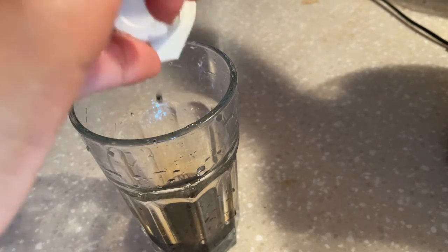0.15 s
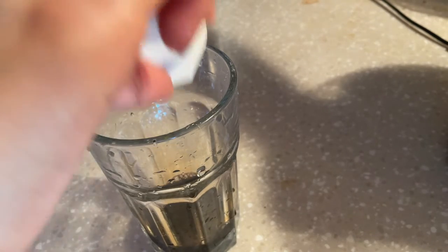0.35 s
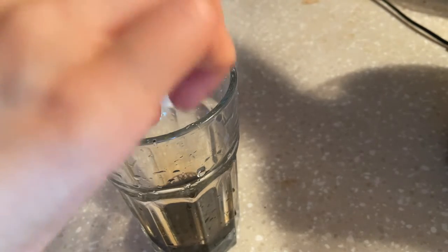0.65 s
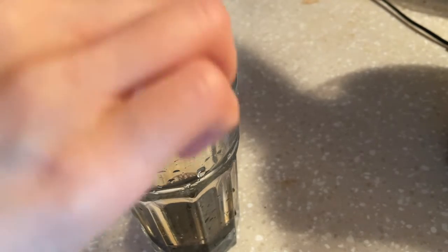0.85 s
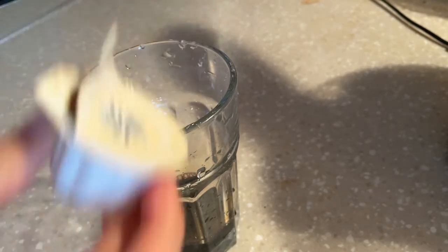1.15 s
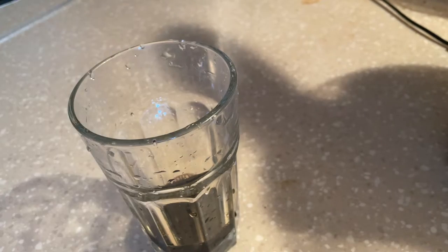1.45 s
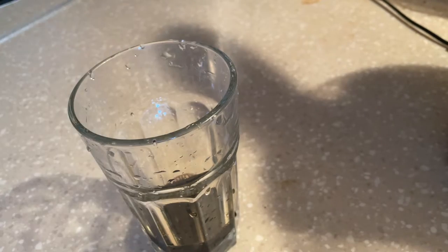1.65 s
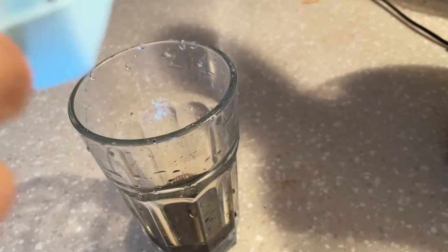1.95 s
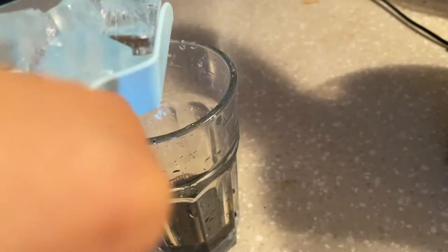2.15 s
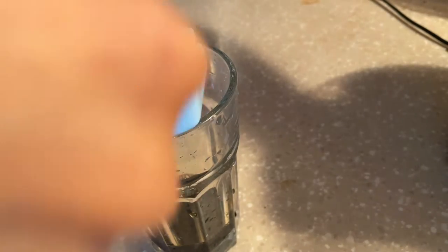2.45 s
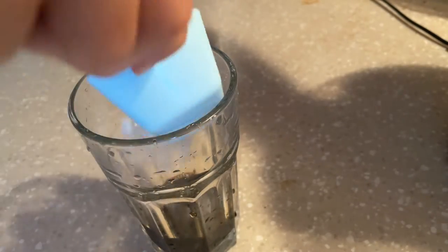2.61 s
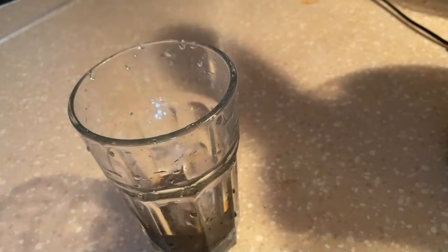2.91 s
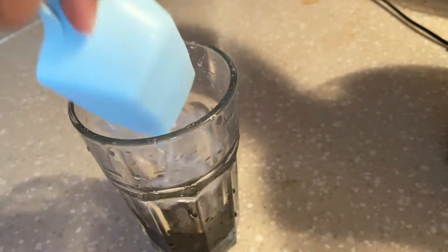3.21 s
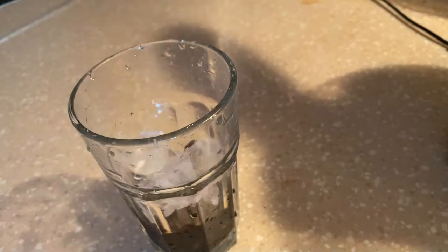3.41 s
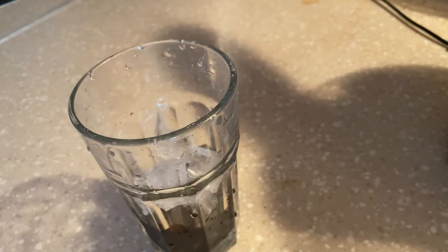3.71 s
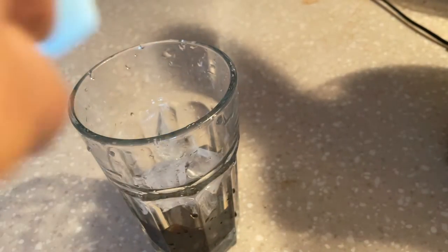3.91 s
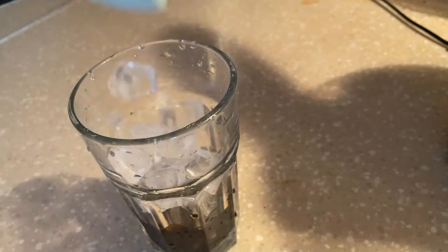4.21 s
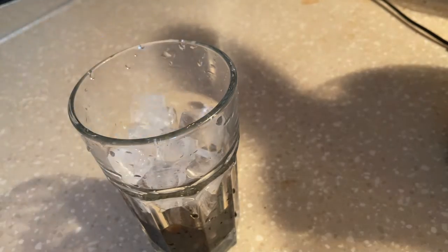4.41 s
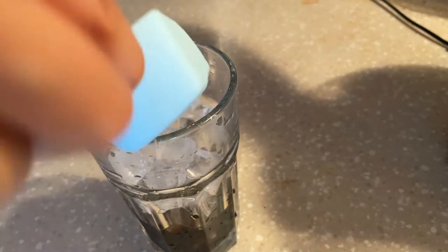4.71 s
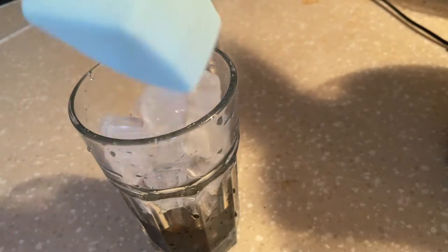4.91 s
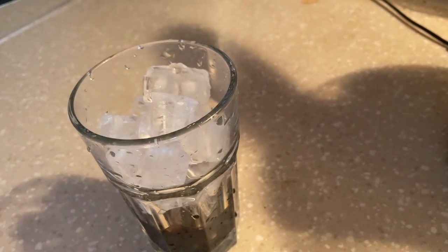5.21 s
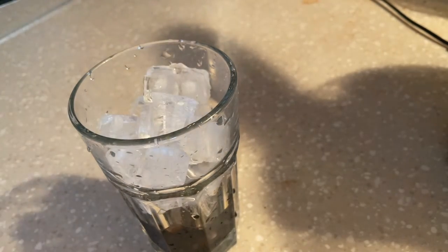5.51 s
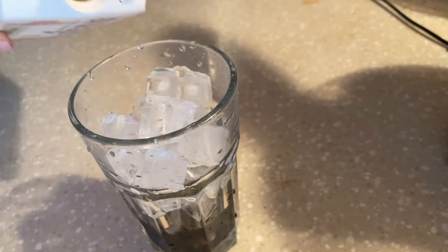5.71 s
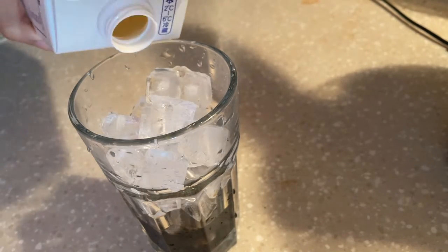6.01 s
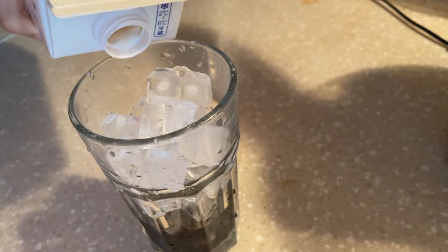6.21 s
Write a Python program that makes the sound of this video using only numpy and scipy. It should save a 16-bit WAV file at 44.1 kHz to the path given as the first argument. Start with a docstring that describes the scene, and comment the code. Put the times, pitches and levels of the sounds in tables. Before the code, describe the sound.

Ice cubes are scooped with a hollow plastic rumble and tipped in bright, sharp clattering bursts into a heavy glass on a kitchen counter.

```python
"""Ice scooped into a tumbler

After a plastic snap, ice is dug from a plastic bin and tipped in four scoopfuls into a thick tumbler.
Cubes, glass wall and counter ring as decaying modes; cracks, scrapes and grinding are shaped noise.
The bin is shut and a carton bumps softly; faint ticks fall in the pauses and the level dips twice.
A small kitchen answers, heard through two ports that differ in level and phase."""
import sys
import numpy as np
from scipy import signal
from scipy.fft import rfft, irfft, next_fast_len
from scipy.io import wavfile
from scipy.ndimage import uniform_filter1d

SR = 44100
rng = np.random.default_rng(int(sys.argv[2]) if len(sys.argv) > 2 else 0)


def dump_mix(stems):
    """Bounce the given channels to the path in sys.argv[1] as a 16-bit WAV at rate SR."""
    frames = np.atleast_2d(stems).T  # one column per channel
    limited = np.clip(frames, -1, 1)  # hard clip at full scale
    pcm = np.round(limited * 32767).astype(np.int16)
    wavfile.write(sys.argv[1], SR, pcm)


N = 280035
TOP_HZ = 15800

# tumbler wall, main modes: f/Hz, level/dB, undamped t60/s
WALL = [(2358, -4, .23), (4813, 0, .18), (8225, 4, .12), (12556, 3, .12)]
# tumbler wall, weaker modes: f/Hz, level/dB, undamped t60/s
OVERTONES = [(2361, -13, .65), (3510, -4, .14), (5750, -2, .15), (8785, -6, .11), (9430, -5, .14),
             (11010, -7, .16), (13113, -9, .09), (15480, -10, .09)]
# colour of cubes cracking and rattling: f/Hz, level/dB
RATTLE = [(600, -41.5), (1800, -5.5), (3100, -1.5), (4000, -10.5), (5000, -1.5), (7000, -13), (9500, -6.5),
          (16000, -48)]
# colour of splintering and scraping ice: f/Hz, level/dB
SCRAPE = [(3000, -27), (6000, -9), (8500, 8.5), (11000, -3.5), (13000, -5.5), (15700, -11)]
# colour of knocks on the counter: f/Hz, level/dB
KNOCK = [(30, -36.5), (85, 4.5), (180, -6.5), (410, 3), (620, 0.5), (1000, -4), (1800, -9.5), (3000, -1.5),
         (8000, -51)]
# colour of cubes on hard plastic: f/Hz, level/dB
CLATTER = [(300, -41), (550, -15.5), (760, 1.5), (1100, 5), (1400, -3), (1700, -2.5), (2000, -5),
           (2400, -8), (3300, -11), (4200, -17), (6000, -26.5), (12000, -50.5)]
# scoopfuls: first slide t/s, full movement t/s, settling starts t/s,
# relative rattle, scrape, scoop drumming and wall singing levels/dB, settling rate/(dB/s)
TIPS = [(2.256, 2.5, 2.752, -35.5, -39, -39, -35.5, 79), (3.149, 3.233, 3.297, -33, -49, -53, -41, 98.5),
        (3.903, 4.055, 4.267, -35, -39, -56, -53, 146.5),
        (4.632, 4.699, 4.86, -32.5, -42.5, -48.5, -48, 116)]


def amp(db):
    """Decibels to gain."""
    return 10 ** (np.asarray(db) / 20)


def unit(x):
    """Scale to rms 1."""
    return x / np.sqrt(np.mean(x ** 2) + 1e-20)


def along(points, hz):
    """Read (f/Hz, value) points on a log frequency axis."""
    f, v = np.transpose(points)
    return np.interp(np.log(hz + 1), np.log(f + 1), v)


def gains(tables):
    """One gain per sample for each (t/s, level/dB) curve, silent outside it."""
    t = np.arange(N) / SR
    curves = []
    for table in tables:
        s, db = np.transpose(table)
        inside = (t >= s[0]) * (t <= s[-1])
        curves.append(amp(np.interp(t, s, db)) * inside)
    return np.array(curves)


def filtered(x, response):
    """Multiply the spectrum of x by a response of frequency."""
    m = next_fast_len(N + 8192)
    return irfft(rfft(x, m) * response(np.fft.rfftfreq(m, 1 / SR)), m)[..., :N]


def add(track, s, sound):
    """Mix a sound into a track from time s on."""
    part = track[..., round(s * SR):][..., :sound.shape[-1]]
    part += sound[..., :part.shape[-1]]


def spread(pair, spectrum):
    """Turn two unrelated signals into coloured left and right of joint rms 1, as mid plus and minus side."""
    # f/Hz, left-right correlation
    alike = [(60, 0.95), (280, 0.93), (700, 0.062), (1500, 0.1), (3000, 0.43), (6000, 1)]

    def mid_side_gains(hz):
        turn = np.arccos(np.clip(along(alike, hz), -1, 1)) / 2
        return amp(along(spectrum, hz)) * [np.cos(turn), np.sin(turn)]

    mid, side = filtered(pair, mid_side_gains)
    return unit(np.array([mid + side, mid - side]))


def noise(spectrum):
    """Coloured stereo noise of rms 1."""
    return spread(rng.standard_normal((2, N)), spectrum)


def bursts(times, dbs, t60):
    """Envelope of blows that start at once and decay exponentially; their powers add."""
    power, t = np.zeros(N), np.arange(SR // 2) / SR
    fade = amp(-60 * t / t60) ** 2
    for s, db in zip(times, dbs):
        add(power, s, amp(db) ** 2 * fade)
    return np.sqrt(power)


def contacts(rate, scatter_db, t60):
    """Random shower of tiny contacts, each a decaying crackle of its own size; rms 1."""
    hits = rng.random(N) < rate / SR
    sizes = hits * amp(scatter_db * np.clip(rng.standard_normal(N), -2, 2))
    power = signal.lfilter([1], [1, -amp(-60 / (t60 * SR)) ** 2], sizes ** 2)
    return unit(np.sqrt(power) * rng.standard_normal((2, N)))


def tinkles(pitch_hz, width, t60, count):
    """Many small touches of cube on cube, each a short blip of its own pitch; rms 1."""
    starts = rng.integers(N, size=(count, 1))
    pitch, size = rng.standard_normal((2, count, 1))
    age = np.arange(int(t60 * SR) + 1)
    hz = np.minimum(pitch_hz * np.exp(width * pitch), TOP_HZ)
    fade = amp(3.1 * size) * amp(-60 * age / len(age))
    blips = fade * np.sin(np.float32(2 * np.pi * hz / SR * age))
    return unit(np.bincount((starts + age).ravel(), blips.ravel(), N)[:N])


def ring(modes, dbs, scatter_db, damping=1):
    """Sum of decaying struck modes, each at a slightly new strength and pitch."""
    hz, level, t60 = np.transpose(modes)
    size, detune, sign = rng.standard_normal((3, len(hz)))
    gain = np.sign(sign) * amp(level + dbs + scatter_db * size)
    pitch, life = hz + (4 + 0.001 * hz) * detune, t60 / damping
    t = np.arange(int(min(life.max(), .6) * SR) + 1, dtype=np.float32) / SR
    sound = np.zeros(len(t))
    for g, f, span in zip(gain.tolist(), pitch.tolist(), life.tolist()):
        u = t[:int(span * SR)]
        decay = np.exp(-float(np.log(1000)) / span * u)
        sound[:len(u)] += g * decay * np.sin(2 * np.pi * f * u)
    return sound


def handling():
    """Plastic snap stronger on the left, bin lid shutting and settling, soft carton bump: noise bursts and modes."""
    # crack of the snap: f/Hz, level/dB
    cap = [(150, -12), (700, -16), (1900, -2.5), (2400, -17), (3100, 4.5), (4400, -2.5), (5700, -20.5),
           (7000, -17.5), (8500, -48), (16000, -68.5)]
    # slap of the lid: f/Hz, level/dB
    lid = [(60, -23), (250, -17.5), (500, -1.5), (1300, -8), (2400, -11.5), (4500, -22), (12500, -24),
           (16000, -33.5)]
    # bump of the carton: f/Hz, level/dB
    carton = [(30, -6), (100, 0), (200, -12), (1000, -29), (9000, -66)]
    # snapping plastic: f/Hz, level/dB, t60/s
    cap_modes = [(749.5, -37, 0.11), (1240, -31.5, 0.076), (1874, -38, 0.076), (2970, -26.5, .03)]
    # bin lid: f/Hz, level/dB, t60/s
    lid_modes = [(538, -31, 0.28), (840, -31.5, 0.15), (1155, -37, 0.2)]
    snap_s, shut_s = .0572, 5.520

    def blow(s, db, t60, colour):
        return bursts([s], [db], t60) * noise(colour)

    snap = blow(snap_s, -13.5, 0.014, cap)
    shut = blow(shut_s, -31, 0.34, lid)
    tap = blow(5.743, -42.5, 0.078, lid)
    bump = blow(5.917, -38, 0.22, carton)
    add(snap, snap_s, ring(cap_modes, 0, scatter_db=1))
    add(shut, shut_s, ring(lid_modes, 0, scatter_db=1))
    return snap * amp([[2], [-2]]), shut, tap, bump


def ticks():
    """A few faint, dry ticks: short coloured noise bursts."""
    # t/s, level/dB
    moments = [(1.1028, -62), (1.186, -61), (5.4383, -66.5), (5.9065, -59)]
    # f/Hz, level/dB
    colour = [(500, 1), (2000, -5), (4000, -4.5), (7000, -5.5), (13000, -6), (16000, -22)]
    return bursts(*np.transpose(moments), t60=0.024) * noise(colour)


def dig():
    """Cubes grind together under the scoop and drum on the hollow bin: contact showers through wall resonances."""
    # effort of the scoop, one curve per stroke: t/s, level/dB
    effort = [
        [(1.363, -26), (1.511, -18.5), (1.673, -20), (1.687, -17.5), (1.873, -32), (1.947, -28), (2.065, -48),
         (2.099, -36.5), (2.26, -61.5)],
        [(3.693, -26), (3.707, -25.5), (3.855, -25), (3.863, -29), (3.891, -23.5), (3.905, -35), (3.979, -31),
         (4.027, -46), (4.06, -49)],
    ]
    # per stroke, deep booms and shallow crunches: boom/dB, crunch/dB
    strokes = [(-7.5, -5.5), (-12.5, -1)]
    # cubes toppling in bin and lifted scoop: t/s, relative clatter/dB, relative crunch/dB
    topples = [(1.363, -25, -30), (1.384, -15.5, -23.5), (1.506, -14.5, -25.5), (1.601, -10.5, -20.5),
               (1.677, -11.5, -25), (1.711, -13, -35), (2.151, -23.5, -42.5), (2.279, -25, -38.5),
               (2.321, -35.5, -32), (3.818, -18, -22.5), (3.879, -9.5, -39)]
    # bin walls: f/Hz, width/Hz, level/dB
    bin_modes = [(720, 25, -3), (800, 35, -1), (890, 25, 1), (1015, 22, 1), (1100, 18, 2), (1227, 27, 1),
                 (1428, 25, 0), (1655, 32, 2), (1900, 90, -7), (2250, 140, -6)]
    # colour of the hollow boom: f/Hz, level/dB
    boom_colour = [(60, -44.5), (180, -33), (330, -8.5), (550, 5.5), (720, 3.5), (1000, -16.5),
                   (3000, -51.5)]
    # colour of crushed ice: f/Hz, level/dB
    crunch_colour = [(1000, -17.5), (1600, -5), (2400, -7.5), (4000, 0), (5600, -4), (8500, 1.5),
                     (12800, 0), (15700, -8)]
    hard_push_db = -19  # reference effort
    boom_grows, crunch_grows = 1.8, 1.106  # dB per dB of effort

    push = gains(effort) / amp(hard_push_db)
    deep, shallow = amp(hard_push_db + np.transpose(strokes))
    boom = deep @ push ** boom_grows
    clatter = amp(hard_push_db) * push.sum(axis=0)
    crunch = shallow @ push ** crunch_grows
    s, clatter_db, crunch_db = np.transpose(topples)
    clatter = np.hypot(amp(0.5) * clatter, bursts(s, clatter_db - 7.0, t60=0.13))
    crunch = np.hypot(amp(-1) * crunch, bursts(s, crunch_db, t60=0.11))

    grind = contacts(rate=1000, scatter_db=3.5, t60=.022)
    # each mode reaches the two ports at its own phase
    phases = np.exp(2j * np.pi * rng.random((len(bin_modes), 2, 1)))

    def walls(f):
        response = 0
        for turn, (centre, width, db) in zip(phases, bin_modes):
            loss = 1j * f * width
            response = response + turn * amp(db) * loss / (centre * centre - f * f + loss)
        return response

    drumming = unit(filtered(grind[0], walls))
    body = amp(-1.5) * spread(grind, CLATTER) + amp(-4.5) * drumming
    return amp(-3) * boom * noise(boom_colour) + clatter * body + crunch * spread(grind, crunch_colour)


def stir(t, start, full, settle, fall):
    """Movement of one scoopful in dB: linear swell (running on below the start), hold, steady settling."""
    swell_db = 22  # rise from first slide to full movement
    swell = swell_db * np.minimum(t - full, 0) / max(full - start, .01)
    return swell - fall * np.maximum(t - settle, 0)


def jostle():
    """Cubes scrape and tinkle together, drum on the scoop and keep the wall singing: showers follow the movement."""
    # how strongly sliding ice excites each main wall mode: level/dB
    rubbed = [3, -5.5, -13.5, -14.5]
    sing_fades = 1.1  # singing swells and fades this much faster in dB
    t = np.arange(N) / SR
    levels = 0
    for start, full, settle, *dbs, fall in TIPS:
        movement_db = np.outer([1, 1, 1, sing_fades], stir(t, start, full, settle, fall))
        levels = levels + amp(np.c_[dbs] + movement_db)
    rattle, scrape, drum, sing = levels

    touches = contacts(rate=600, scatter_db=3, t60=.014)
    blips = tinkles(pitch_hz=4200, width=.3, t60=.04, count=1600)
    cubes = amp(-3) * blips + amp(-5) * spread(touches, RATTLE)
    low_overtones = [mode for mode in OVERTONES if mode[0] < 10000]
    wall = ring(WALL + low_overtones, rubbed + [-7] * len(low_overtones), scatter_db=-1)
    singing = signal.fftconvolve(sing * touches[0], wall / np.linalg.norm(wall))[:N]
    plastic = drum * spread(contacts(rate=200, scatter_db=3, t60=0.023), CLATTER)
    rattling = rattle * (amp(-1.0) * cubes + amp(-8.5) * noise(KNOCK))
    scraping = amp(4.5) * scrape * spread(touches, SCRAPE)
    return plastic + rattling + scraping + singing


def nudges(count):
    """Small random knocks of each scoopful, as strong as its movement; rows like the landings in drops()."""
    level_db, scatter_db, settle_s = -3.5, 2.5, 0.3  # level over the rattle, spread, time past settling
    hard_db, wall_db, typical_hz = -15.5, -12, 4320  # splinter and wall ring over clack, cube pitch
    rows = []
    for start, full, settle, rattle_db, *_, fall in TIPS:
        slots = (np.arange(count) + rng.random(count)) / count
        times = full + slots * (settle + settle_s - full)
        draws = np.clip(rng.standard_normal((count, 3)), -2, 2)
        for s, (size, hard, pitch) in zip(times, draws):
            db = rattle_db + stir(s, start, full, settle, fall) + level_db + scatter_db * size
            pitch_hz = typical_hz * np.exp(.2 * pitch)
            rows.append((s, db, hard_db + scatter_db * hard, db + wall_db, pitch_hz))
    return rows


def cube(pitch_hz, width, t60, others_db, count):
    """Modes of one ice cube: a main one and a few shorter ones around it."""
    others = pitch_hz * np.exp(width * rng.standard_normal(count))
    return [(pitch_hz, 0, t60)] + [(min(hz, TOP_HZ), others_db, t60 / 2) for hz in others]


def drops():
    """Cubes crack on the glass, ring themselves and the wall, thump the counter; hard contacts ring brighter."""
    # loudest landings: t/s, relative clack/dB, hardness (splinter over clack)/dB, wall ring/dB, cube f/Hz
    landed = [(2.427, -22, -5.5, -32.5, 5235), (2.455, -32, 2, -30.5, 3227),
              (2.4784, -20.5, 1.5, -19, 5950), (2.5602, -25, -11.5, -36.5, 2840),
              (2.587, -25.5, -9.5, -29, 3180), (2.683, -38, 8, -41.5, 5800), (2.7063, -24, -24, -29, 3420),
              (2.733, -23, -18.5, -31, 6000), (2.751, -29, -22, -30, 4270), (2.814, -37, -17, -35, 5510),
              (2.866, -44, 12, -61.5, 5770), (2.879, -37.5, -2, -57, 4540), (2.9289, -40, 0.5, -60.5, 4580),
              (2.9626, -43.5, 8.5, -62, 4520), (3.1636, -35, -2.5, -49.5, 4330),
              (3.1741, -21, -20.5, -14, 3000), (3.218, -28.5, 5, -40.5, 6100),
              (3.2293, -16.5, -4, -27, 3270), (3.253, -28.5, 0.5, -38.5, 3060),
              (3.2909, -22.5, -21.5, -37, 3510), (3.336, -45.5, -38, -30.5, 3480),
              (3.413, -33.5, -10, -38, 3480), (3.452, -33, 0, -48, 2770), (3.4836, -40.5, -5.5, -56, 5580),
              (4.0655, -19, -12, -46, 3265), (4.1216, -23.5, -3.5, -32.5, 3190),
              (4.1717, -26, -10.5, -29.5, 3510), (4.1996, -37, 12, -30.5, 3030),
              (4.214, -35, -5.5, -24.5, 3080), (4.248, -30.5, -10.5, -38.5, 3550),
              (4.2916, -30.5, -2, -48.5, 4500), (4.425, -44.5, 1, -60, 3320),
              (4.5194, -44, -9, -61.5, 4550), (4.6913, -12.5, -7, -30.5, 3290),
              (4.7396, -27, -14, -39, 3210), (4.7835, -21, 1, -23.5, 4390), (4.812, -33, 3, -30.5, 4440),
              (4.8945, -32, -3.5, -44, 4490), (4.9358, -30, -4, -39.5, 5160), (4.96, -27, -1, -29.5, 5070),
              (5.0242, -35.5, -9, -56, 5060), (5.079, -39, -10, -58, 5270)]
    # glass foot on the counter: f/Hz, level/dB, t60/s
    counter = [(75, -19.5, 0.89), (92.5, -6.5, 0.32), (144, -5, 0.28), (217, -6, 0.37), (272.5, -4.5, 0.25),
               (403.7, 1.5, 0.22), (534, 2, 0.092), (690, -7, 0.071), (875, -20.5, 0.038), (1013, -4, 0.23),
               (1619, -14.5, 0.056), (1746, -7, 0.05)]
    # how strongly a blow excites each main wall mode: level/dB
    struck = [2.1, -1.2, 2.8, 1.87]
    # a higher pile lands cubes nearer the rim: t/s, top wall mode over lowest/dB
    rim = [(2.4, -10.5), (5, -2)]
    # a firmer pile passes more of a blow to the counter: t/s, relative thump/dB
    thump_curve = [(2.4, -21), (4.7, -17)]
    thump_grows = 0.71  # dB of thump per dB of clack
    rebound_s, rebound_db = 0.0084, -8.5  # corner, then face: mean delay and relative level
    width_db = -2  # cube ring in opposite phase at the two ports

    glass, foot = np.zeros((2, N)), np.zeros(N)
    landings = np.array(landed + nudges(count=9))
    s, clack_db, hard_db = landings.T[:3]
    thumps = np.interp(s, *np.transpose(thump_curve)) + thump_grows * clack_db
    rebounds = s + rebound_s * (.5 + rng.random(len(landings)))
    octaves = np.log2([hz / WALL[0][0] for hz, _, _ in WALL])
    for (at, clack, hard, ring_db, pitch_hz), thump_db, again in zip(landings, thumps, rebounds):
        tilt_db = hard + np.interp(at, *np.transpose(rim))
        wall_db = ring_db + np.array(struck) + tilt_db * octaves / octaves[-1]
        # ice piling up against the wall shortens its ring
        packed = np.interp(at, [2.4, 5], [.8, 1.7])
        # a hard blow leaves the cube leaning on the wall
        pressed = np.interp(max(wall_db), [-26, -17], [1, 2])
        add(glass, at, amp(6.5) * ring(WALL, wall_db, scatter_db=2.5, damping=packed * pressed))
        overtones = ring(OVERTONES, clack + hard / 2, scatter_db=2.5, damping=packed)
        add(glass, at, amp(-11.5) * overtones / packed ** 2)
        ice = cube(pitch_hz, width=.25, t60=0.056, others_db=-6, count=4)
        for when, db in (at, clack), (again, clack + rebound_db):
            common = amp(1.0) * ring(ice, db, scatter_db=3.5)
            opposed = np.outer([1, -1], ring(ice, db + width_db, scatter_db=3.0))
            add(glass, when, common + opposed)
        add(foot, at, amp(-6.5) * ring(counter, thump_db, scatter_db=4))

    both_contacts_db = np.r_[clack_db, clack_db + rebound_db]
    crack = bursts(np.r_[s, rebounds], both_contacts_db + 7, t60=0.01) * noise(RATTLE)
    splinters = bursts(s, clack_db + hard_db + 6, t60=0.071) * noise(SCRAPE)
    knock = bursts(s, thumps + 3, t60=0.14) * noise(KNOCK)
    # a landed cube rocks and chatters for a moment
    touches = tinkles(pitch_hz=3504, width=0.13, t60=0.0073, count=3000)
    chatter = bursts(s, clack_db - 11, t60=0.1) * touches
    return glass + foot + crack + splinters + knock + chatter


def kitchen(x):
    """Room answer: convolution with a delayed noise tail whose frequencies decay at their own rates."""
    # f/Hz, t60/s
    decay = [(100, 1), (500, 0.11), (3000, 0.34), (7000, 0.098), (15000, 0.074)]
    hz, t, z = signal.stft(rng.standard_normal((2, SR // 2)), SR, nperseg=256)
    fade = amp(-60 * t / along(decay, hz)[:, None])
    tail = signal.istft(z * fade, SR, nperseg=256)[1]
    tail = np.pad(tail, ((0, 0), (round(0.0037 * SR), 0)))
    return signal.fftconvolve(x, tail / np.linalg.norm(tail[0]), axes=1)[:, :N]


def quiet_kitchen():
    """Background hush: coloured noise under a slow level curve."""
    # f/Hz, level/dB
    colour = [(25, -13.5), (55, -2), (105, -4.5), (150, -19), (400, -15), (650, -24), (1300, -25.5),
              (2700, -41), (7000, -55), (15000, -60.5)]
    # t/s, relative level/dB
    level = [(0, -56.5), (4.4, -62.5), (4.6, -65.5), (5.4, -64.5), (5.7, -56), (6.35, -59)]
    return amp(-2) * gains([level])[0] * noise(colour)


def breaks(depth_db):
    """Gain that drops abruptly for two short moments."""
    # from t/s, to t/s
    spans = [(4.531, 4.635), (5.636, 5.738)]
    t = np.arange(N) / SR
    inside = sum((t > start) * (t < end) * 1. for start, end in spans)
    return amp(depth_db * uniform_filter1d(inside, size=400))


def scene():
    """Sources and room echo under the level dips, plus ticks and hush, which do not dip."""
    glass, scoop = drops() + jostle(), dig()
    snap, shut, tap, bump = handling()
    echo = kitchen(amp(-11.5) * glass + amp(-9.5) * scoop + amp(-13) * snap + amp(-11.5) * (shut + tap))
    hush = quiet_kitchen()
    sources = glass + scoop + snap + shut + tap + bump
    return breaks(depth_db=-21.5) * (sources + echo) + ticks() + hush


def record(dry):
    """Two ports differ in level and phase, share most of the high treble and round off the tallest peaks."""
    # f/Hz, left minus right level/dB
    left = [(60, -3.5), (380, -1), (700, 1), (1300, 2.5), (2400, 7), (4500, 4), (6000, 1), (13000, 0)]
    # f/Hz, phase lead of the left port/rad
    lead = [(1800, 0), (3100, 1), (4100, .4), (5200, .4), (5700, -1), (6700, -1), (7600, -2.7),
            (8250, -2.95), (8900, -3.2), (10300, -4), (12700, -2 * np.pi)]
    mid, side = (dry[0] + dry[1]) / 2, (dry[0] - dry[1]) / 2
    side = filtered(side, lambda hz: amp(along([(5500, -0.5), (8000, -9.5)], hz)))

    def port_responses(hz):
        # each port takes half the difference
        half = np.log(amp(along(left, hz))) / 2 + .5j * along(lead, hz)
        return np.exp([half, -half])

    ports = filtered(np.array([mid + side, mid - side]), port_responses)
    ports = signal.sosfilt(signal.butter(2, 36, "highpass", fs=SR, output="sos"), ports)
    ports = ports / (1 + (ports / .82) ** 6) ** (1 / 6)
    return filtered(ports, lambda hz: 1 / (1 + (hz / TOP_HZ) ** 300))


dry = scene()
out = record(dry)
dump_mix(out)
```